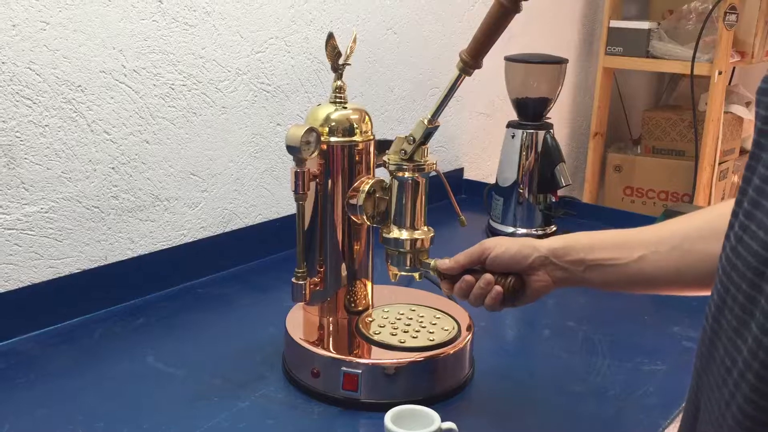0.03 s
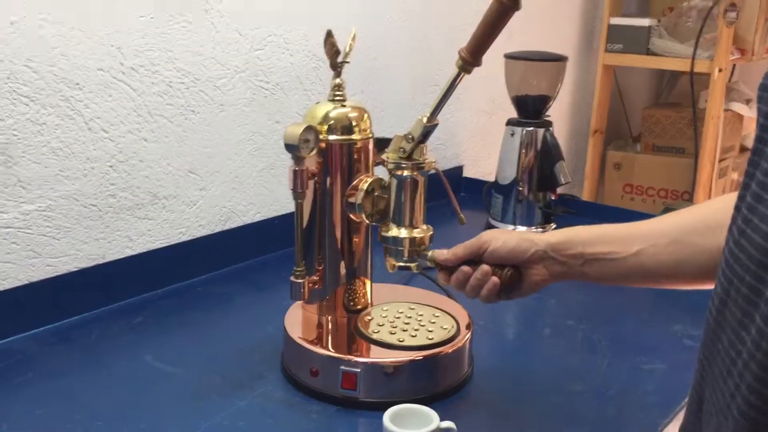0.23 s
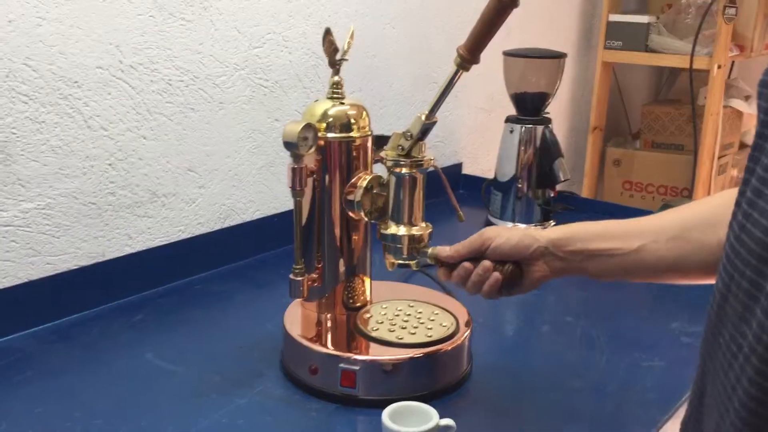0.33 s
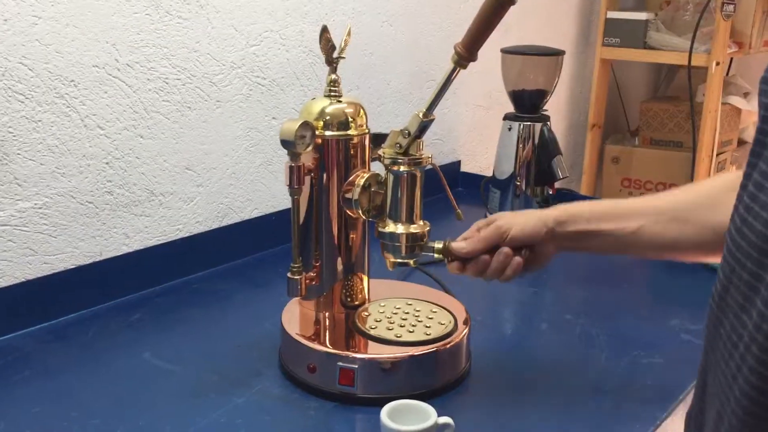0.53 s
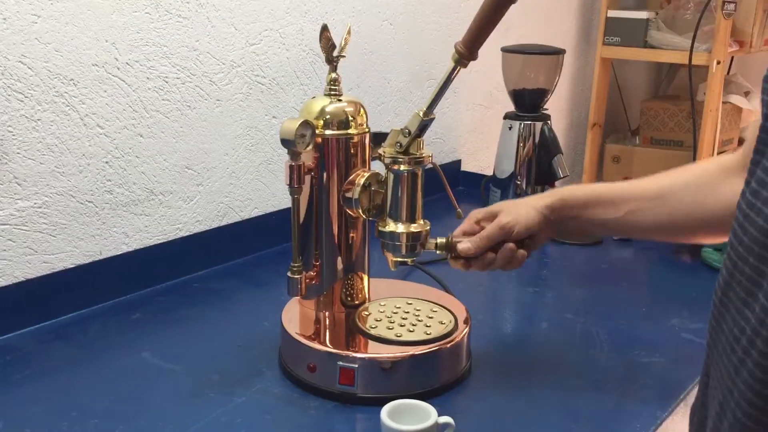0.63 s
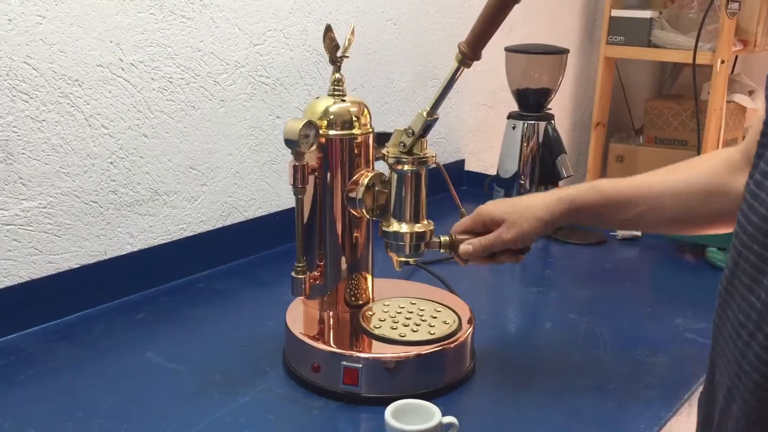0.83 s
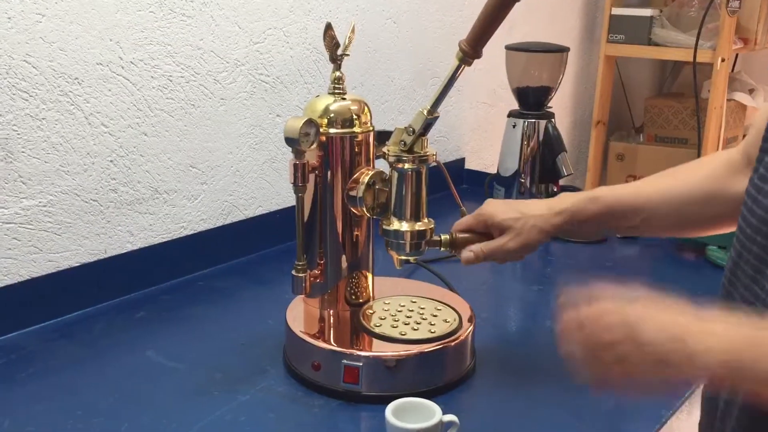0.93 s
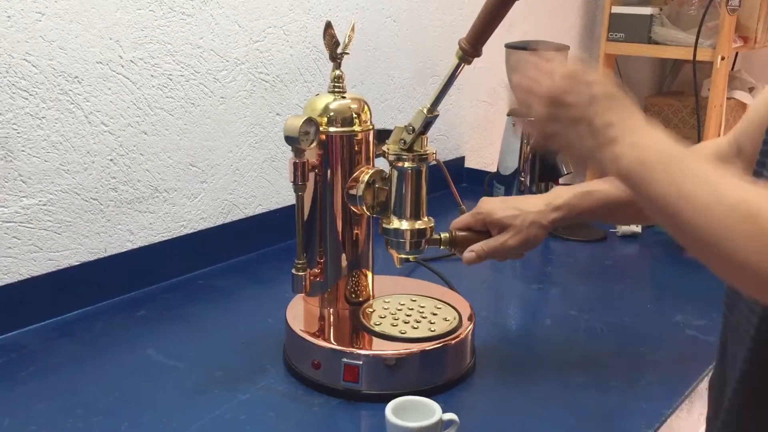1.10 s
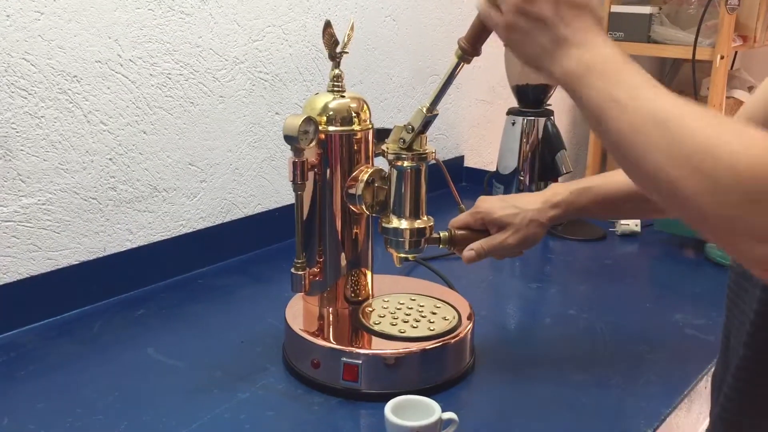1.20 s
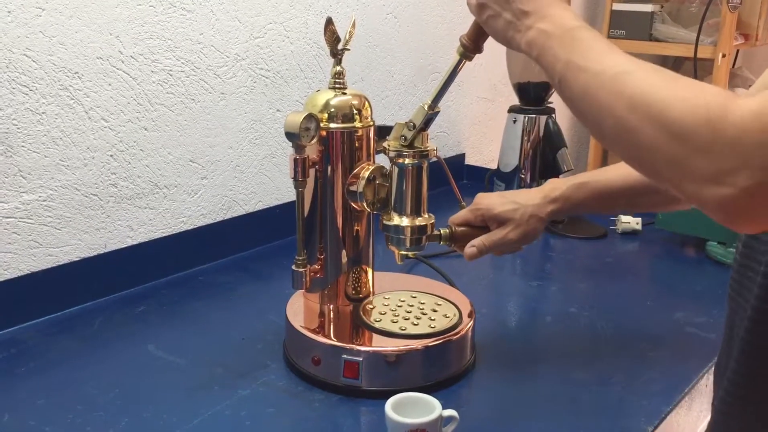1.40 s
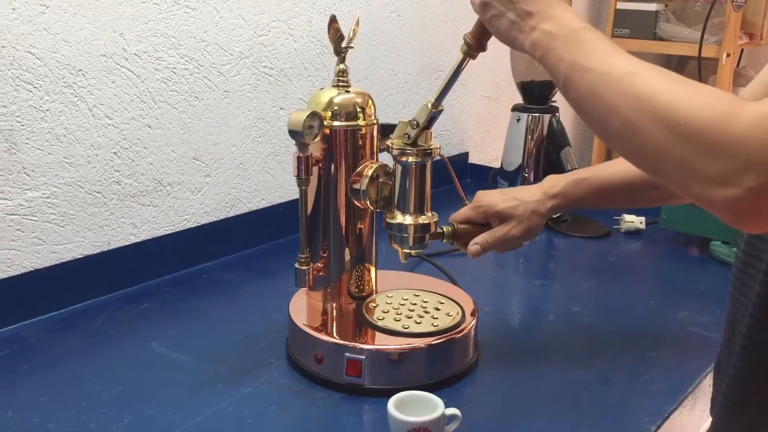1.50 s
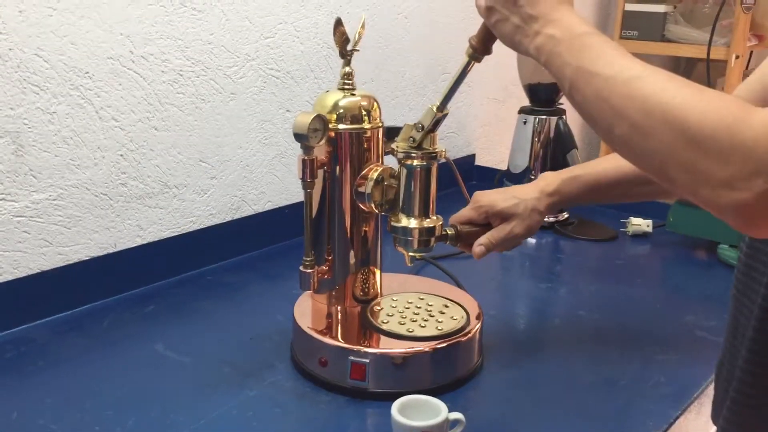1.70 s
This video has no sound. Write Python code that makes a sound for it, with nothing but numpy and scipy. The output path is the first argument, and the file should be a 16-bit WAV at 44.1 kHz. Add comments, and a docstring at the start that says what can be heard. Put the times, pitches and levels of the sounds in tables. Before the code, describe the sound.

A metal portafilter scrapes briefly into an espresso machine and seats with a sharp, ringing clack. Three faint knocks with low counter thumps follow as it tightens. After a pause, cloth rubs softly with a dull bump, nearby in a small room.

```python
"""A brass portafilter slides into the group of a lever espresso machine: it scrapes, chatters and seats
with a ringing clack, then its lugs knock three times as the handle is turned tight.
Underneath, the machine thumps on its counter in a small hard room. Cloth rubs with a soft hiss
as an arm reaches up, and the hand takes the lever with a dull bump."""
import sys
import numpy as np
from scipy import signal
from scipy.fft import rfft, irfft, next_fast_len
from scipy.io import wavfile
from scipy.ndimage import map_coordinates

SR = 44100
rng = np.random.default_rng(int(sys.argv[2]) if len(sys.argv) > 2 else 0)


def dump(signal):
    """Clip the signal to [-1, 1] and save it as 16-bit WAV at the path in sys.argv[1]."""
    limited = np.clip(np.atleast_2d(signal).T, -1, 1)
    pcm = np.round(limited * 32767).astype(np.int16)
    wavfile.write(sys.argv[1], SR, pcm)


N = 77175


def amp(db):
    """Decibels to gain."""
    return 10 ** (np.asarray(db) / 20)


def unit(x):
    """Scale to rms 1."""
    return x / np.sqrt(np.mean(x ** 2) + 1e-20)


def along(points, hz):
    """Read (f/Hz, value) points on a log axis."""
    f, v = np.transpose(points)
    return np.interp(np.log(hz + 1), np.log(f + 1), v)


def envelope(rows):
    """Gain per sample from (t/s, level/dB) rows, silent before the first."""
    return amp(np.interp(np.arange(N) / SR, *np.transpose(rows), left=-120))


def noise(spectrum, size=N, eq_db=lambda f: 0):
    """Noise of rms 1, coloured by (f/Hz, level/dB) points and an optional EQ curve."""
    m = next_fast_len(size)
    hz = np.fft.rfftfreq(m, 1 / SR)
    gain = amp(along(spectrum, hz) + eq_db(hz))
    return unit(irfft(rfft(rng.standard_normal(m)) * gain, m)[:size])


def fade(t, t60):
    """Exponential decay by 60 dB in t60."""
    return np.exp(-np.log(1000) * t / t60)


def attack(t, rise_s):
    """A rounded onset from 0 to 1."""
    return 1 - np.exp(-t / rise_s)


def ring(modes, t):
    """Damped sines of (f/Hz, level/dB, t60/s) modes, alternating in sign."""
    return sum((-1) ** k * amp(db) * fade(t, t60) * np.sin(2 * np.pi * hz * t)
               for k, (hz, db, t60) in enumerate(modes))


def ping(hz, t, t60):
    """A damped tone with a rounded start."""
    return np.sin(2 * np.pi * hz * t) * fade(t, t60) * attack(t, 0.00036) ** 2


def add(track, s, sound):
    """Mix a sound into the track at time s."""
    part = track[int(round(s * SR)):][:len(sound)]
    part += sound[:len(part)]


def with_tail(x, t60s, wet_db, predelay_s=0.001):
    """A sound plus a fresh diffuse tail that decays by (f/Hz, t60/s) points."""
    hz, t, bands = signal.stft(rng.standard_normal(SR // 2), SR, nperseg=256)
    tail = signal.istft(bands * fade(t, along(t60s, hz)[:, None]), SR, nperseg=256)[1]
    tail *= attack(np.maximum(np.arange(len(tail)) / SR - predelay_s, 0), 0.0012)
    wet = signal.fftconvolve(x, tail / np.linalg.norm(tail))
    return np.pad(x, (0, len(wet) - len(x))) + amp(wet_db) * wet


# colour of the room's air: f/Hz, relative level/dB
AIR_SPECTRUM = [(20, 5), (45, -9), (80, -4), (130, -8), (190, -9), (300, -15.5), (420, -14.5), (700, -22),
                (1300, -21), (3000, -23), (5000, -26.5), (9000, -32), (15800, -37)]

def room_tone():
    """A steady, faint bed of rumble and hiss."""
    return amp(-65) * noise(AIR_SPECTRUM)


# swells of the rim sliding, then binding: t/s, level/dB
SLIDE_ENVELOPE = [(0, -78), (.04, -70), (.085, -60), (.13, -64.5), (.17, -69), (.2, -58), (.23, -80)]
BIND_ENVELOPE = [(.195, -68), (.21, -56.5), (.225, -48.5), (.235, -80)]
# their colours: f/Hz, relative level/dB
SLIDE_SPECTRUM = [(200, -6.5), (420, -13), (560, -4.5), (740, -1.5), (950, -16.5), (1500, -36),
                  (4000, -35.5), (9000, -45.5)]
BIND_SPECTRUM = [(200, -2), (700, 1), (1300, -2), (2400, -9.5), (5000, -28), (6600, -15), (8500, -25),
                 (16000, -34)]

def rim_scrape():
    """The rim slides into the group with a hollow rub that brightens as it binds."""
    slide = envelope(SLIDE_ENVELOPE) * noise(SLIDE_SPECTRUM)
    bind = envelope(BIND_ENVELOPE) * noise(BIND_SPECTRUM)
    return slide + bind


# metal-on-metal hits: t/s, level/dB, corner f/Hz, roll-off below and above/(dB/octave), snap boost/dB
CONTACTS = [(.190, -64, 603, 13, 17, -10), (.1995, -45.5, 537, 14, 37, 0.5),
            (0.201, -54.5, 3870, -11, 21, 5), (0.2269, -38.5, 4050, 2, 24, -1),
            (0.2335, -28.5, 2224, 15, 12, 15), (0.2375, -26.5, 667, 18.5, 6, -1.5),
            (.2398, -35.5, 2200, 0, 6, 14), (.2450, -37, 754, 6, 7, 10), (0.2526, -39, 3580, 1.5, 3, 7.5),
            (.2603, -26, 6340, 4.5, 7, 2.5), (.2630, -23, 3595, 3, 5.5, 12),
            (0.266, -27, 1093, 1, 6.5, 7.5), (.2702, -30, 1010, 17, 7, -2), (0.299, -44.5, 430, 1, 17, 9),
            (0.3184, -45, 2800, -2.5, 18, 8), (0.337, -47, 600, -33, 10, 15)]
# damped modes of the clamped portafilter and group: f/Hz, relative level/dB, t60/s
BRASS_MODES = [(563.5, -4, 0.055), (714, -1.5, 0.075), (905, -1, 0.027), (1079, -1, 0.074),
               (1940, -6, 0.072), (1950, -11.5, 0.023), (2512, -2, 0.026), (2910, -9.5, 0.09),
               (3520, -6.5, 0.019), (3740, -1, 0.012), (3924, 2.5, 0.021), (5710, -4, 0.043),
               (5740, -11.5, 0.023), (6860, -1, 0.025)]
# the crack of countless fine modes: f/Hz, relative level/dB
CRACK_SPECTRUM = [(100, 6.5), (300, 13.5), (1000, 2.5), (1400, 4.5), (2200, 0.5), (3800, -1), (4600, -4.5),
                  (6500, -2), (8200, -3.5), (11000, -5), (16000, -6.5)]
# tails of the boiler shell and of the small room: f/Hz, t60/s
SHELL_DECAY = [(100, 0.59), (500, 0.37), (1200, 0.52), (2200, 0.49), (4000, 0.4), (7000, 0.34),
               (14000, 0.28)]
ROOM_DECAY = [(200, 0.42), (1000, 0.4), (4000, 0.32), (12000, 0.19)]

def brass_clack():
    """Each contact snaps and excites its own range of the brass; the boiler shell adds a dense tail."""
    out, t = np.zeros(N), np.arange(SR // 6) / SR
    hz, db, t60 = np.transpose(BRASS_MODES)
    for s, hit_db, corner_hz, below, above, snap_db in CONTACTS:
        def hit_eq(f):
            octaves = np.log2((f + 1) / corner_hz)
            return np.minimum(below * octaves, -above * octaves)
        mode_db = db + hit_eq(hz) + rng.normal(0, 1, len(hz))
        mode_db -= 10 * np.log10(np.sum(amp(mode_db) ** 2) / 2)  # unit power before the decay
        detuned_hz = hz * (1 + 0.0053 * rng.standard_normal(len(hz)))
        body = ring(zip(detuned_hz, mode_db, t60), t)
        crack = noise(CRACK_SPECTRUM, len(t), hit_eq) * fade(t, t60=0.043)
        hit = (amp(-3) * body + amp(-3.5) * crack) * attack(t, rise_s=0.000072)
        snap = ping(corner_hz, t, t60=0.0092)
        add(out, s, amp(hit_db) * with_tail(hit, SHELL_DECAY, wet_db=-6))
        add(out, s, amp(hit_db + snap_db) * with_tail(snap, ROOM_DECAY, wet_db=-14))
    return out


# pushes on the counter: t/s, level/dB, length/s
PUSHES = [(.240, -30.5, 0.0094), (.2715, -33, 0.0056), (0.376, -46.5, 0.0037), (0.488, -54, 0.0016),
          (0.558, -56.5, 0.0025), (0.661, -46.5, 0.0087), (0.716, -50.5, 0.0096)]
# the counter's boom: f/Hz, relative level/dB, t60/s
COUNTER_MODES = [(66.7, -7, 0.68), (83, -4, 0.34), (112.6, 6.5, 0.126), (154, -2, 0.039)]

def counter_thumps():
    """Soft pushes through the machine set the counter booming; longer ones sound duller."""
    out, t = np.zeros(N), np.arange(SR) / SR
    boom = ring(COUNTER_MODES, t)
    for s, db, length_s in PUSHES:
        push = np.sin(np.pi * np.minimum(t / length_s, 1)) ** 2
        add(out, s, amp(db) * signal.fftconvolve(boom, push / push.sum()))
    return out


# basket, spout and boiler: f/Hz, level/dB, t60/s
FREE_MODES = [(437, -49, .36), (657, -48, .62), (703, -46, .42), (1020, -40, .17), (1072, -45, .55),
              (1134, -44, .34), (1888, -58, .35), (2064, -54, .4), (2524, -51, .35), (3680, -49, .22),
              (3958, -57, .22), (10083, -39, .165), (15320, -51, .17)]

def seating_ring(seat_s=0.263):
    """The hardest hit seats the portafilter and leaves the free parts ringing."""
    out = np.zeros(N)
    add(out, seat_s, ring(FREE_MODES, np.arange(SR) / SR))
    return out


# lug hits as the handle turns: t/s, level/dB, low-pass f/Hz, ping f/Hz, transient boost/dB
KNOCKS = [(0.477, -59, 900, 2730, 13.5), (0.5549, -46.5, 970, 2740, -3.5), (0.6587, -41, 3600, 2243, 0.5)]
# body of the locked group: f/Hz, relative level/dB, t60/s
GROUP_MODES = [(312, -12, .22), (410, -8, .06), (565, 1, .09), (732, -13, .12), (900, -10, .06),
               (1035, 1, .085), (1075, -7, .2), (1125, -7, .13), (1290, -11, .06), (2135, -15, .17),
               (2215, -6, .15), (2730, -15, .17), (2855, -12, .16), (3650, -8, .04)]
# colour of a lug's tick: f/Hz, relative level/dB
TICK_SPECTRUM = [(200, 3), (420, -9), (900, 19), (1700, 1.5), (2800, 0), (3800, 7.5), (4700, -13),
                 (5800, -4.5), (8000, -25), (11000, -36), (16000, -47)]

def lug_knocks():
    """The lugs tick and ping, and the locked group rings; softer knocks reach only its low modes."""
    out, t = np.zeros(N), np.arange(SR // 2) / SR
    hz, db, t60 = np.transpose(GROUP_MODES)
    for s, hit_db, cutoff_hz, ping_hz, transient_db in KNOCKS:
        lowpass_db = -10 * np.log10(1 + (hz / cutoff_hz) ** 4)
        body = ring(zip(hz, db + lowpass_db, t60), t)
        tick = noise(TICK_SPECTRUM, len(t)) * fade(t, t60=0.042)
        transient = amp(transient_db) * (ping(ping_hz, t, t60=0.034) + amp(-3) * tick)
        add(out, s, amp(hit_db) * with_tail(body + transient, ROOM_DECAY, wet_db=-9))
    return out


# swell of the rubbing cloth: t/s, relative level/dB
CLOTH_ENVELOPE = [(1.25, -75), (1.274, -74.5), (1.312, -55.5), (1.382, -47.5), (1.466, -49.5),
                  (1.52, -54.5), (1.566, -65), (1.628, -63), (1.746, -79), (1.75, -74)]
# colour of its hiss: f/Hz, relative level/dB
CLOTH_SPECTRUM = [(100, -19.5), (300, -12.5), (520, -15), (900, -11), (1200, -1.5), (2200, -2.5),
                  (4300, -5), (6500, -5.5), (7600, -11.5), (12000, -12.5), (15800, -18)]

def cloth_rub(grain_hz=710, grain_db=1.5):
    """Cloth hisses with the fine grain of catching fibres."""
    grain = map_coordinates(rng.standard_normal(N // 8), [np.arange(N) * grain_hz / SR])
    hiss = unit(noise(CLOTH_SPECTRUM) * amp(grain_db * grain))
    return amp(-0.5) * envelope(CLOTH_ENVELOPE) * hiss


def lever_bump(grip_s=1.404, hz=117):
    """A dull, slow-edged bump as the hand takes the lever."""
    out, t = np.zeros(N), np.arange(SR) / SR
    bump = np.sin(2 * np.pi * hz * t) * fade(t, t60=0.13) * attack(t, rise_s=0.02)
    add(out, grip_s, amp(-37.5) * bump)
    return out


def scene():
    """All layers over the room tone, in mono."""
    return (room_tone() + rim_scrape() + brass_clack() + counter_thumps() + seating_ring()
            + lug_knocks() + cloth_rub() + lever_bump())[None]


def record(dry):
    """Master EQ: a gentle low cut and a brick-wall top."""
    low_cut_hz, top_hz = 50, 15900
    m = next_fast_len(N + SR // 2)
    thinned = signal.sosfilt(signal.butter(2, low_cut_hz, "high", fs=SR, output="sos"), dry)
    passband = np.fft.rfftfreq(m, 1 / SR) < top_hz
    return irfft(rfft(thinned, m) * passband, m)[..., :N]


dry = scene()
out = record(dry)
dump(out)
```